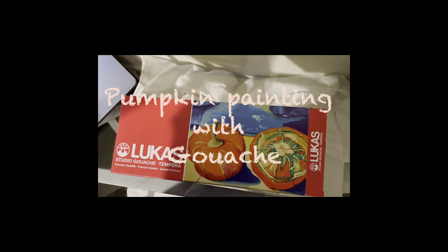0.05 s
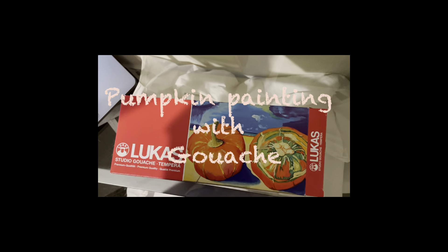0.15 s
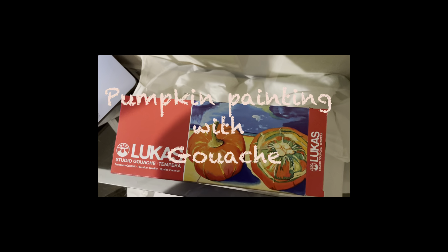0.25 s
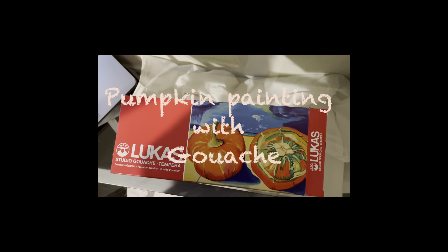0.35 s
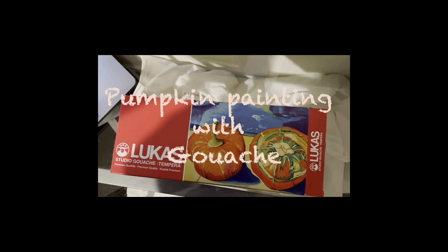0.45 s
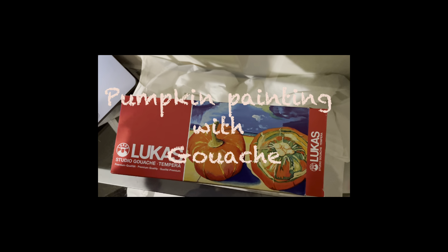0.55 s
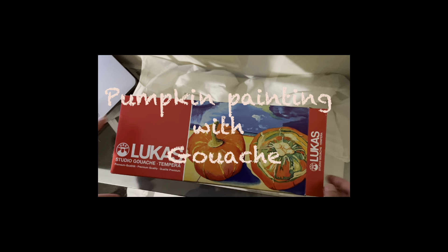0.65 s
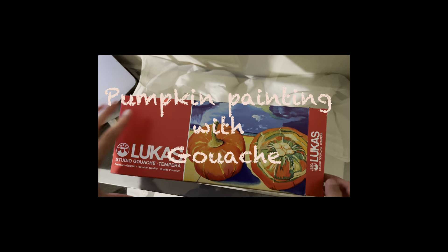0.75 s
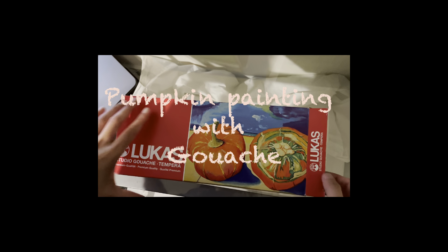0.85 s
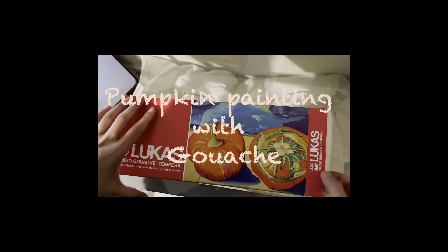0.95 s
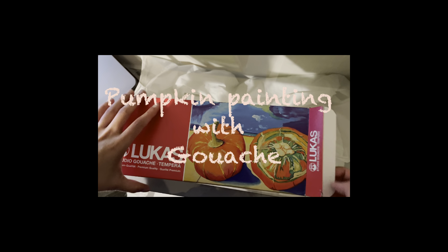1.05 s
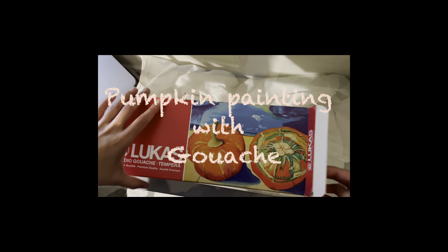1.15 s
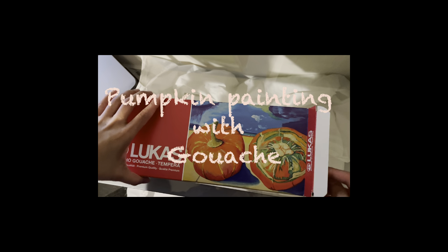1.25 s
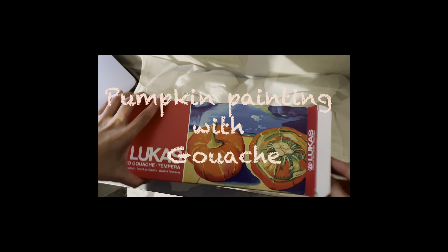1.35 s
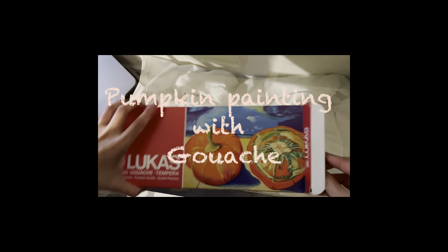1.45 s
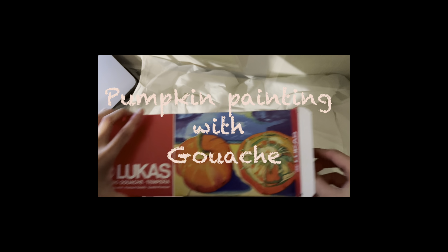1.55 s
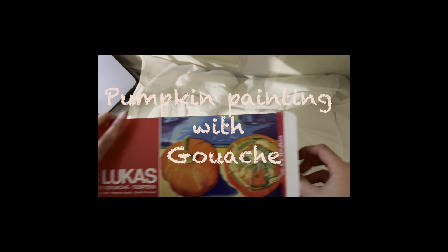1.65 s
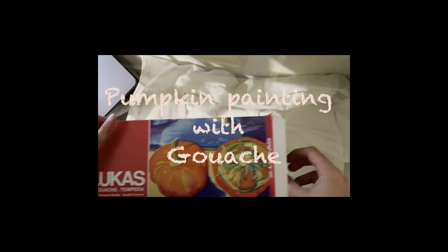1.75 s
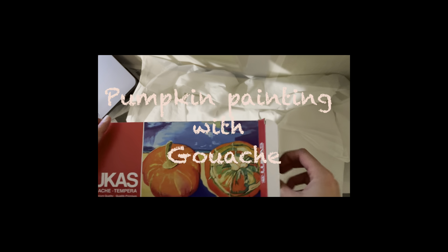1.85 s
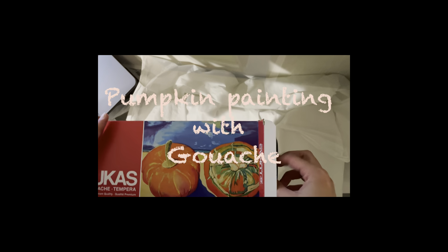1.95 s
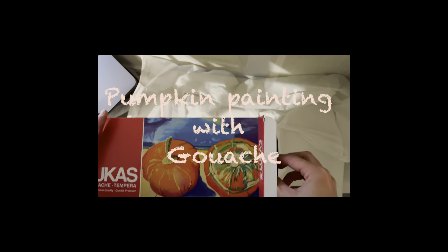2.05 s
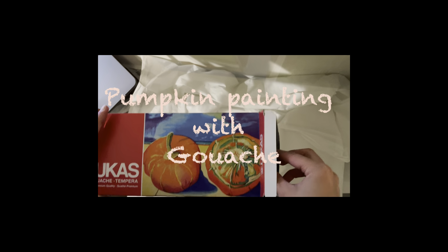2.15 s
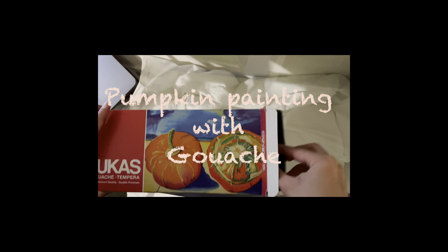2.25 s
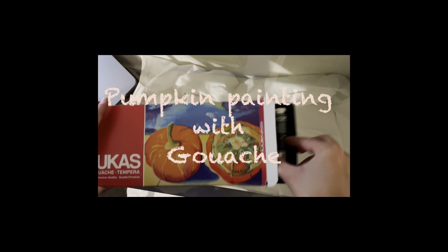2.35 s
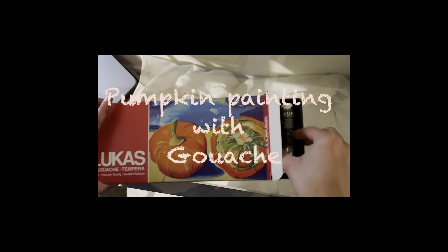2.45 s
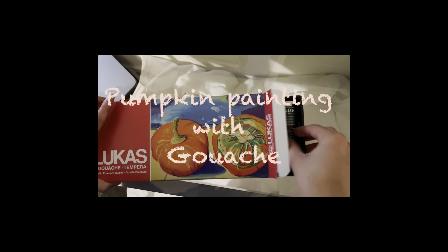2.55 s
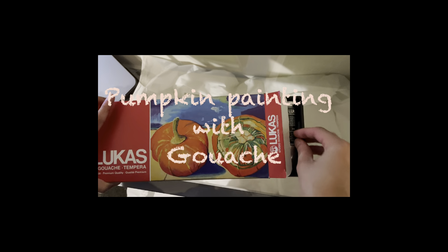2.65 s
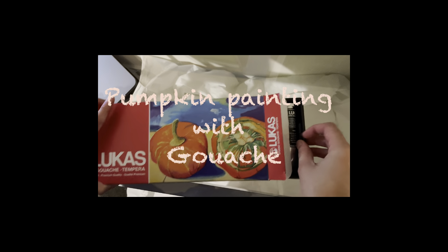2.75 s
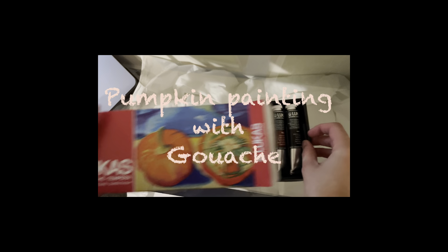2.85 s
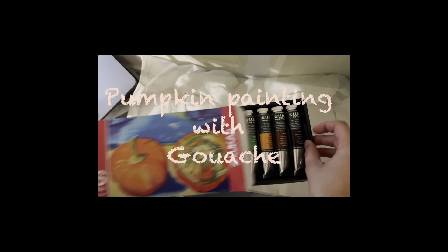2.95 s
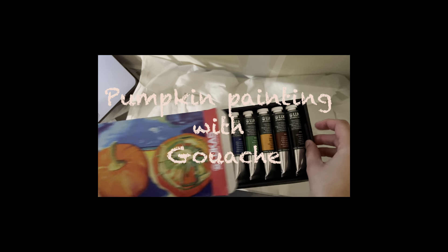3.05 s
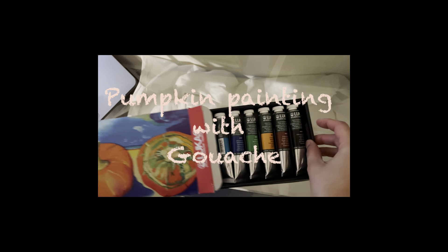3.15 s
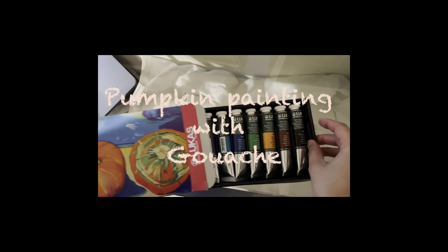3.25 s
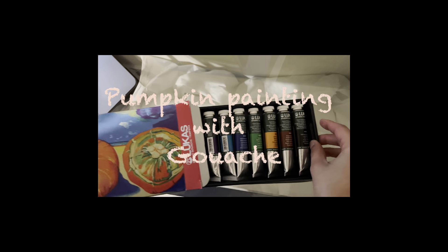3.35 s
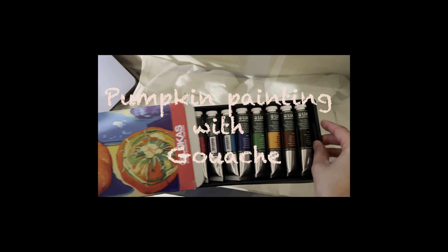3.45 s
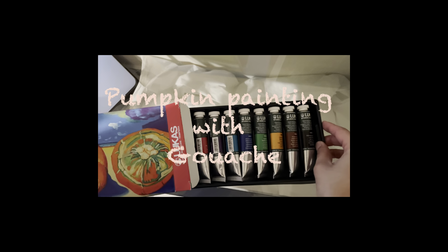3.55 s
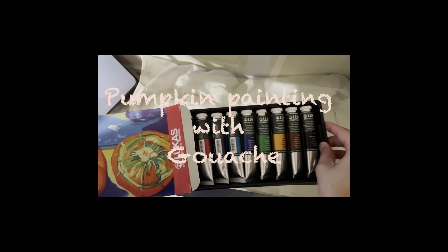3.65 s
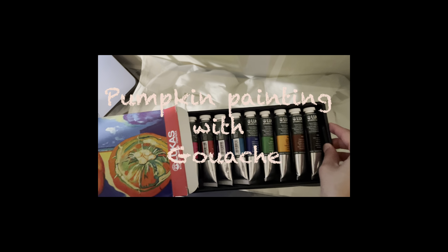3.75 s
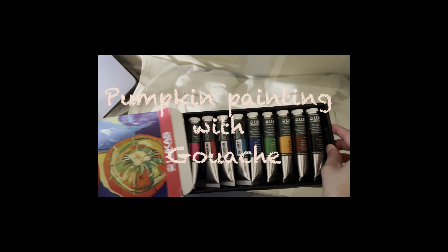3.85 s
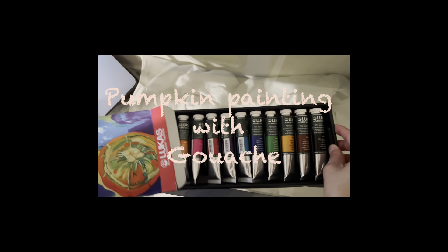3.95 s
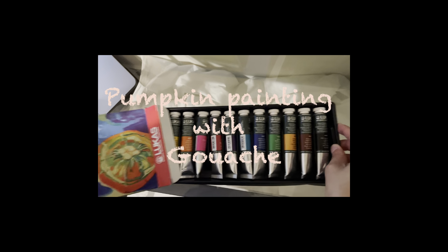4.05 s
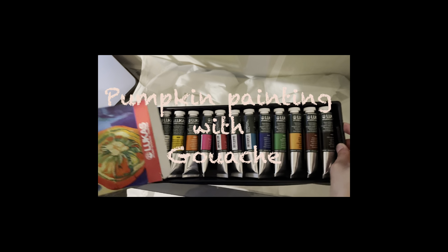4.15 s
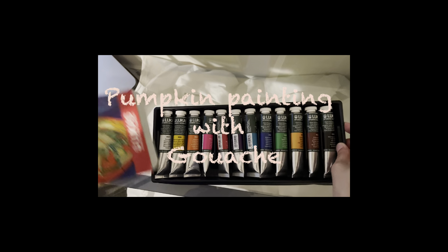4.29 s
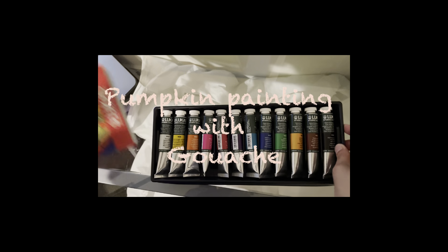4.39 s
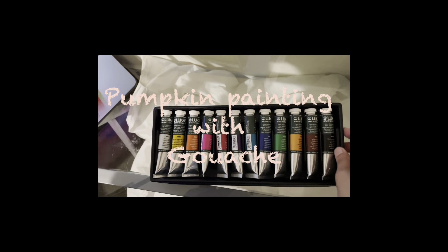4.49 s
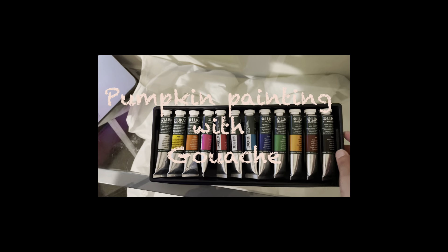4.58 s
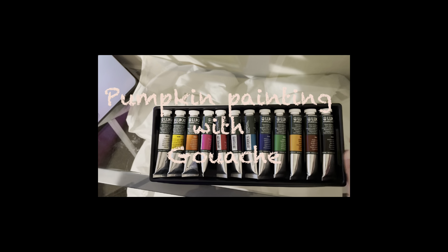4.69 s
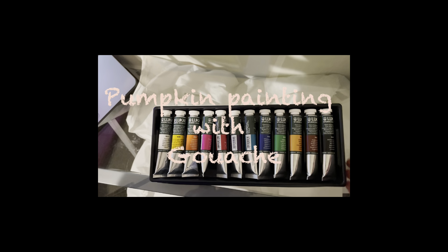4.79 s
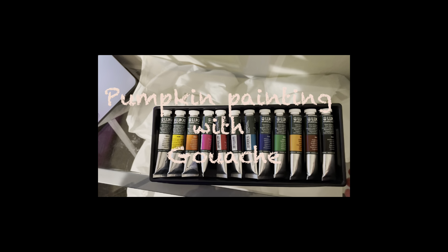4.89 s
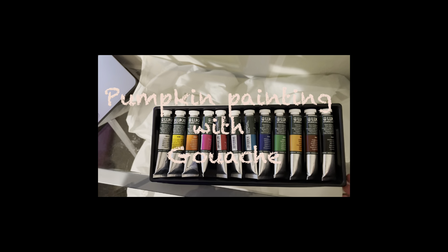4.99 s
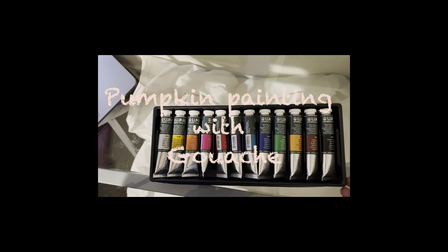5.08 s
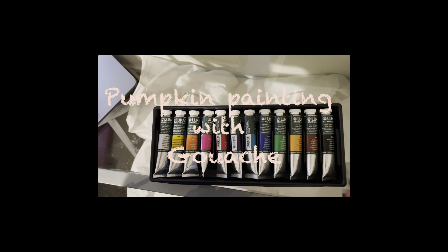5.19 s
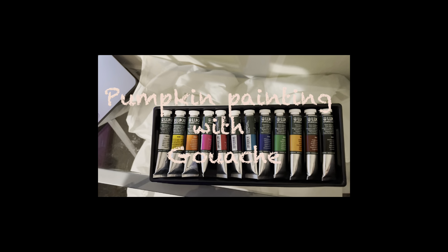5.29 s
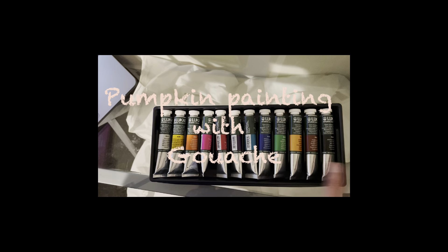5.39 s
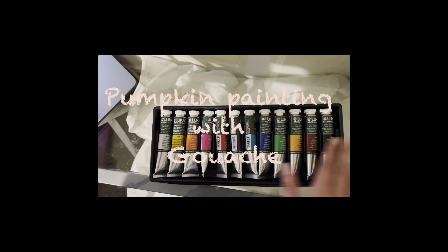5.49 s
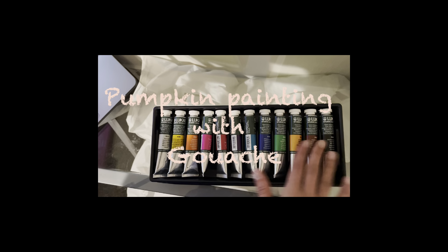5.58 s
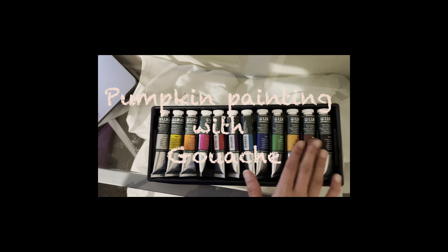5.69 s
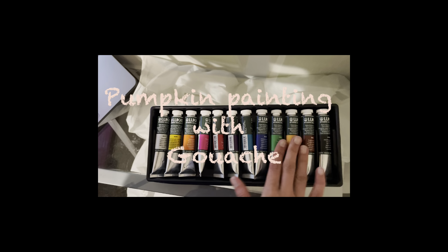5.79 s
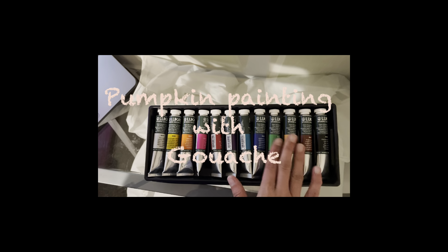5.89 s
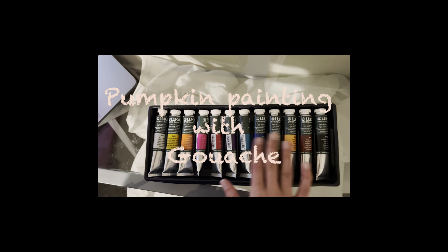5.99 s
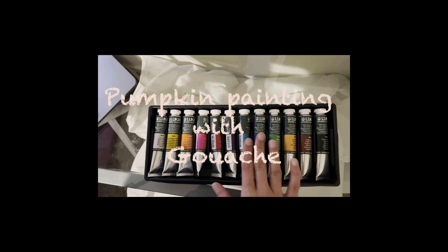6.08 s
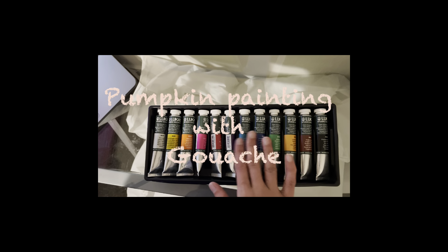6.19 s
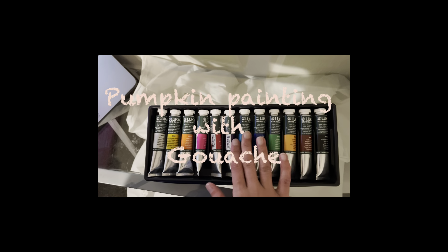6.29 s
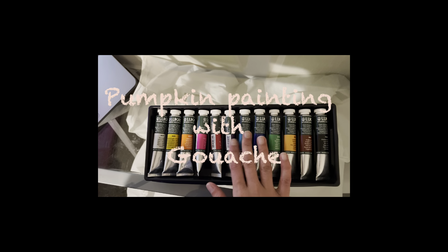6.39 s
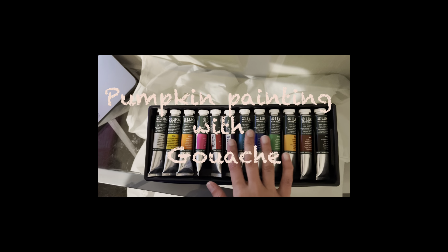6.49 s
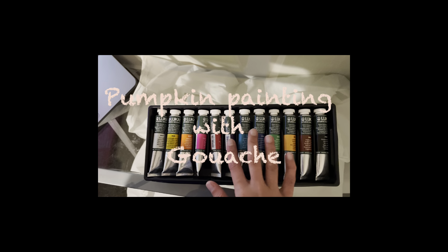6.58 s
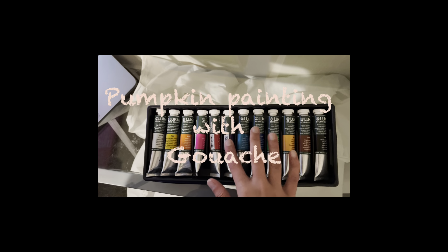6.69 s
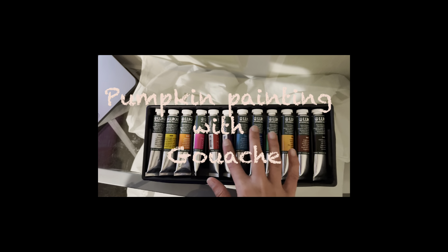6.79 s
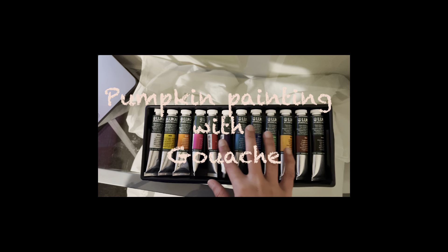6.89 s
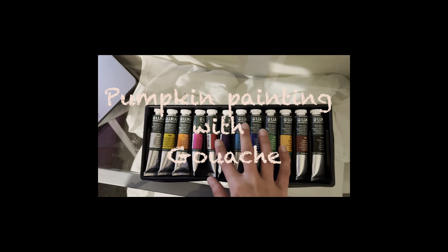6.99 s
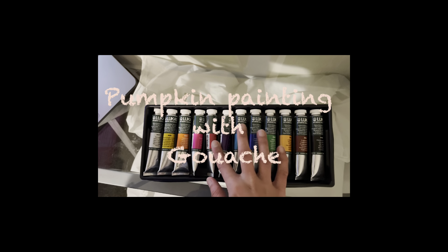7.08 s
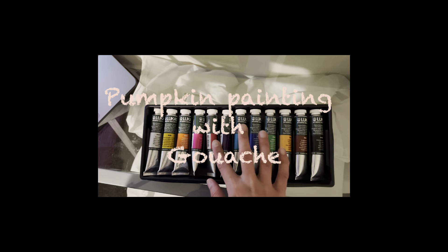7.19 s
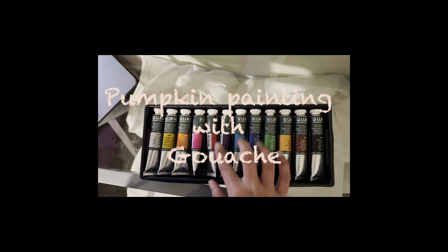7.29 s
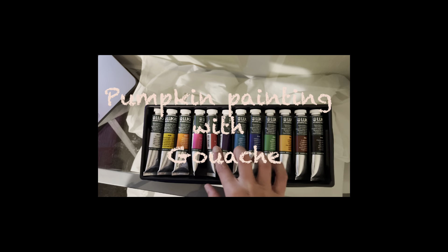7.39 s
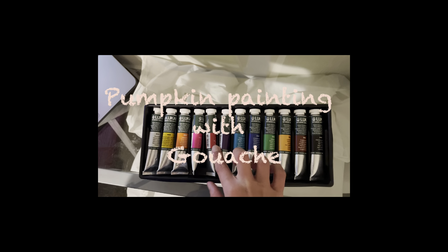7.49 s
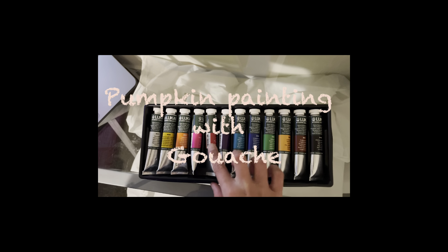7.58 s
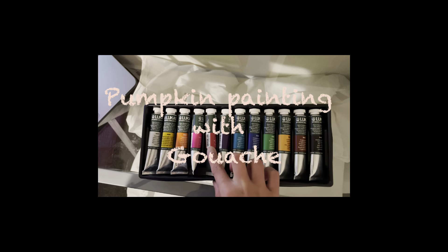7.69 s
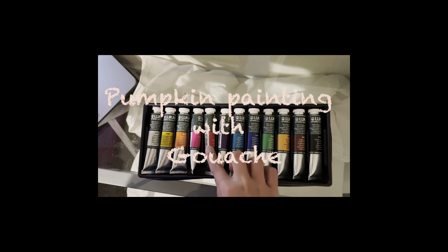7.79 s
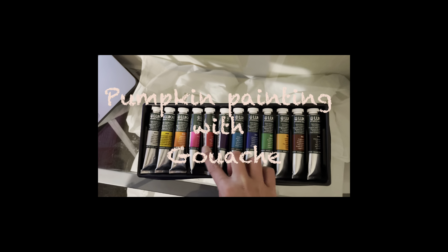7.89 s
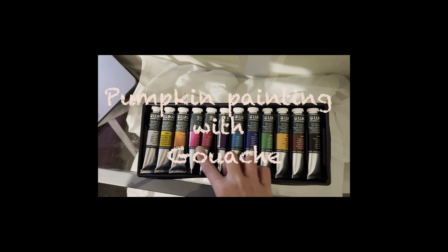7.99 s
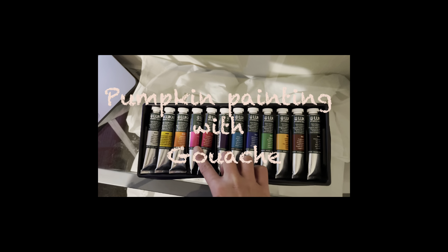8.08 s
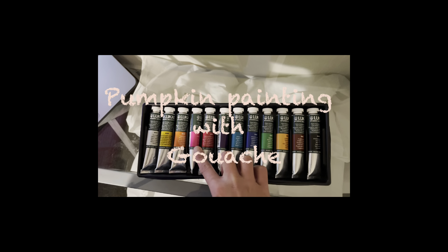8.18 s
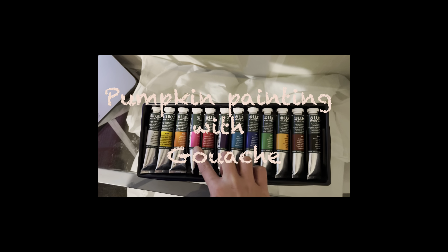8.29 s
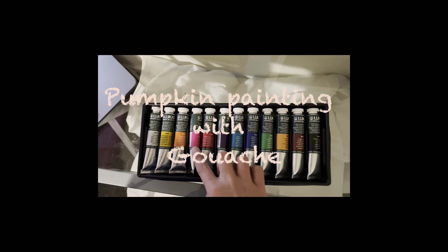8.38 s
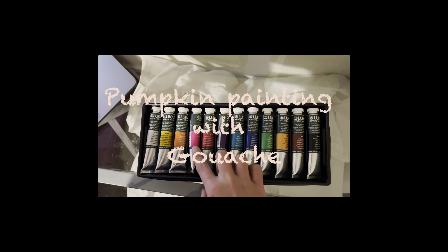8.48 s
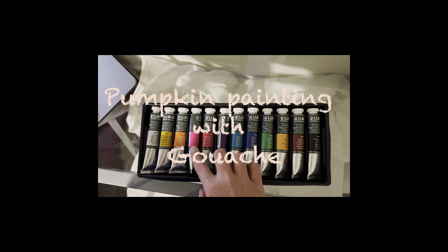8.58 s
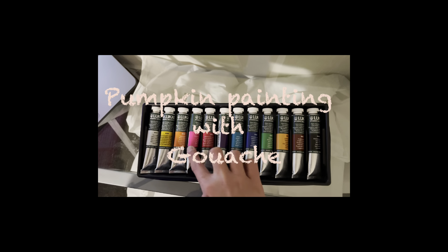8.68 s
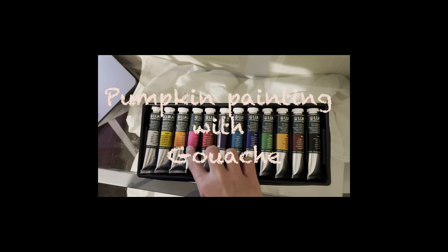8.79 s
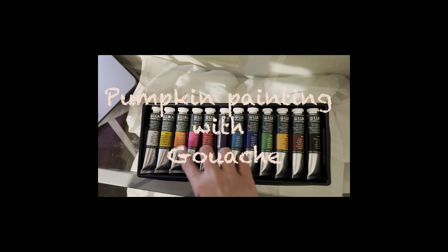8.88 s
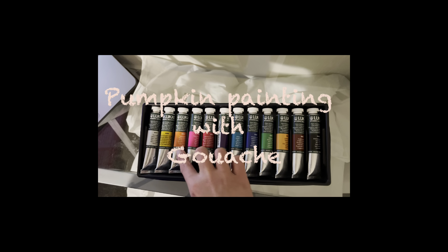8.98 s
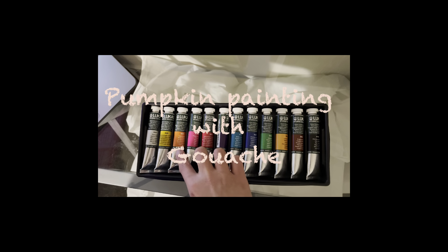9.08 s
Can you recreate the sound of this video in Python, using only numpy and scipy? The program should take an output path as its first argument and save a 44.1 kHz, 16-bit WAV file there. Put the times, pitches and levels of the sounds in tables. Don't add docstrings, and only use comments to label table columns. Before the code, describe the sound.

A close, dry perspective in a small furnished room, with soft air, a faint appliance hum and low traffic rumble throughout. From about 0.6 s fingers brush a cardboard box; small knocks near 1.0 lead to a sharp crack at 1.35, then papery rubs and a light squeak until 1.9. A short scraping tug at 2.1-2.4 ends in a clack, followed by a hard, hollow knock at 2.6. The longest, loudest gritty slide runs 2.75-3.55, swelling early, with knocks at 3.2 and 3.4. A third pull from 3.6 breaks into a strong clatter at 3.9-4.3 with table thumps. Quiet card rubbing fades by 5. Fingers then touch the tubes: a crisp knock at 5.7, soft rolling and thuds around 6.0-6.2, sparse faint ticks and rubs, another firm knock at 8.2 and small taps to 9. A distant engine drones faintly around 5.5-6.7 and briefly again between 7 and 8.

```python
import sys
import numpy as np
from scipy import signal
from scipy.fft import rfft, irfft, next_fast_len
from scipy.io import wavfile

SR = 44100
rng = np.random.default_rng(int(sys.argv[2]) if len(sys.argv) > 2 else 0)


def wrap_up_sound(samples):
    columns = np.atleast_2d(samples).T
    tamed = np.clip(columns, -1, 1)
    steps = np.round(tamed * 32767).astype(np.int16)
    wavfile.write(sys.argv[1], SR, steps)


def field_ratio(decibels):
    return 10 ** (np.asarray(decibels, dtype=float) / 20)


N = 403074

# [f/Hz, level/dB per Hz]
DUST = [(2940, -7.5), (5000, -4.5), (6020, -6.5), (12800, -15), (15100, -17), (16000, -13)]


def rms_one(x):
    return x / np.sqrt(np.mean(x ** 2) + 1e-20)


def in_time(tables, fade_s=0.0083):
    t, rows = np.arange(N) / SR, np.concatenate(tables)
    gate = sum(np.clip(np.minimum(t - r[0][0], r[-1][0] - t) / fade_s + 2, 0, 1) for r in tables)
    return [np.minimum(gate, 1)] + [np.interp(t, rows[:, 0], c) for c in rows[:, 1:].T]


def drift(rate):
    r = np.exp(-2 * np.pi * rate / SR)
    return rms_one(signal.lfilter([1], [1, -2 * r, r * r], rng.standard_normal(N + SR))[SR:])


def colour(x, spectrum):
    size = next_fast_len(N)
    hz, db = np.transpose(spectrum)
    f = np.maximum(np.fft.rfftfreq(size, 1 / SR), 1)
    gain = field_ratio(np.interp(np.log(f), np.log(hz), db))
    return rms_one(irfft(rfft(x, size) * gain, size)[:N])


def resonance(x, hz, width):
    r = np.exp(-np.pi * width / SR)
    poles = [1, -2 * r * np.cos(2 * np.pi * hz / SR), r * r]
    return signal.lfilter(np.array([1, 0, -1]) * (1 - r * r) / 2, poles, x)


def body(x, modes):
    parts = (field_ratio(db) * resonance(x, hz, w) / np.sqrt(w) for hz, w, db in modes)
    return rms_one(sum((-1) ** k * part for k, part in enumerate(parts)))


def slips(per_s, spread_db, clump_db):
    sizes = field_ratio(spread_db * np.minimum(rng.exponential(1, N), 5)) * rng.choice([-1, 1], N)
    born = rng.random(N) < per_s / SR
    return rms_one(sizes * born * field_ratio(clump_db * drift(60)) + 1e-18)


def patchy(x, depth_db, rate):
    edges = np.geomspace(500, 16500, 45)
    out = np.zeros(N)
    for k, pair in enumerate(zip(edges, edges[1:])):
        band = signal.sosfilt(signal.butter(2, pair, "band", fs=SR, output="sos"), x)
        out += (-1) ** k * band * field_ratio(depth_db * drift(rate))
    return rms_one(out)


def struck(events, over_db):
    size = 8000
    out, t = np.zeros(N + size), np.arange(size) / SR
    for (s, length, hz, db), n in zip(events, rng.standard_normal((len(events), size))):
        shove = n * np.exp(-t / (0.25 * length))
        tone = resonance(resonance(shove, hz, 4.4 / length), hz, 4.4 / length)
        out[round(s * SR):][:size] += field_ratio(db + over_db) * tone / np.abs(tone).max()
    return out[:N]


def background():
    # [f/Hz, level/dB per Hz]
    air_spectrum = [(25, -19.5), (127, -5.5), (520, -18), (1000, -12), (2220, -22), (3250, -36.5),
                    (12500, -71.5), (16000, -76.5)]
    # [f/Hz, width/Hz, level/dB]
    room_tones = [(124, 36, -72), (256, 9.5, -69), (970, 67, -81.5), (1450, 42, -68.5)]
    # [f/Hz, level/dB]
    mains = [(120, -78.5), (240, -63.5)]
    # [t/s, pitch/Hz, level/dB]
    drone = [
        [(5.45, 240.6, -85), (5.6, 255.3, -53), (5.75, 278.3, -55.5), (6.45, 282.8, -59), (6.7, 275.4, -95)],
        [(7.05, 226, -91), (7.1, 224.5, -44), (7.2, 217.5, -59), (7.25, 243, -76)],
        [(7.4, 268, -70), (7.85, 257, -54.5), (7.95, 256, -96)],
    ]
    # [t/s, rumble level/dB, relative room air level/dB]
    outside = [(0.0, -79, 2), (0.3, -61, 2.5), (3.51, -63, 1), (4.2, -70, 5), (4.38, -64.5, -1),
               (5.52, -63, -1.5), (5.9, -58.5, -0.5), (6.49, -64, 1), (6.82, -58.5, -0.5),
               (8.09, -61, -1.5), (8.38, -57.5, -0.5), (9.14, -60, -1)]
    t = np.arange(N) / SR
    _, rumble_db, air_db = in_time([outside])
    air = field_ratio(-57 + 0.8 * drift(3.5)) * colour(rng.standard_normal(N), air_spectrum)
    air += sum(field_ratio(db) * rms_one(resonance(rng.standard_normal(N), hz, w)) for hz, w, db in room_tones)
    hum = sum(field_ratio(db + 0.5 * drift(4.9)) * np.sqrt(2) * np.sin(2 * np.pi * hz * t) for hz, db in mains)
    low_band = signal.butter(2, [60, 170], "band", fs=SR, output="sos")
    low = signal.sosfilt(low_band, rng.standard_normal(N))
    traffic = field_ratio(rumble_db - 0.5 + 0.96 * drift(7.5)) * rms_one(low)
    gate, hz, db = in_time(drone)
    phase = 2 * np.pi * np.cumsum(hz + 5 * drift(10)) / SR
    engine = gate * field_ratio(db + 2.5 * drift(9)) * np.sin(phase)
    return field_ratio(air_db) * air + hum + traffic + engine


def reflections(x):
    size = next_fast_len(N + SR)
    f = np.fft.rfftfreq(size, 1 / SR)
    t60 = 0.21 / (1 + f / 5000)
    wet = 0
    for k, delay_s in enumerate(rng.uniform(.006, .025, 8)):
        loop = field_ratio(-60 * delay_s / t60) * np.exp(-2j * np.pi * f * delay_s)
        wet = wet + (-1) ** k * (1 / (1 - loop) - 1)
    return irfft(rfft(x, size) * wet, size)[:N]


def thumps():
    # [t/s, level/dB, f/Hz]
    table_thumps = [(1.06, -46, 129), (1.1, -42.5, 253), (4.287, -48, 312), (2.609, -50, 151),
                    (4.018, -39.5, 220), (4.051, -40.5, 300), (4.168, -45, 273), (5.69, -42, 251),
                    (5.759, -46.5, 99), (5.69, -48.5, 75), (5.52, -53, 120), (6.018, -44.5, 99),
                    (6.178, -41.5, 106), (6.191, -41, 254), (8.179, -40, 98.5), (8.18, -45.5, 292),
                    (4.02, -42, 125), (4.03, -48, 75), (4.035, -38.5, 240), (4.045, -42, 120),
                    (4.055, -48, 80), (4.125, -52.5, 70), (8.192, -46, 200), (6.03, -45.5, 280)]
    return struck([(s, .04, hz, db) for s, db, hz in table_thumps], over_db=4.5)


def hollows():
    # [t/s, length/s, f/Hz, level/dB]
    card_rings = [(1.078, 0.038, 696, -43), (2.592, 0.0081, 440, -34), (2.609, 0.019, 1200, -28),
                  (2.612, 0.025, 600, -37), (4.168, 0.049, 970, -39.5), (4.284, 0.03, 500, -40),
                  (2.616, 0.03, 410, -35), (5.684, 0.015, 480, -39), (3.879, 0.019, 670, -29),
                  (6.02, 0.04, 885, -52), (6.185, 0.031, 1130, -44), (8.18, 0.025, 1370, -38.5),
                  (8.177, 0.019, 700, -42), (8.188, 0.03, 1010, -43), (4.03, 0.018, 1700, -26.5),
                  (4.04, 0.07, 410, -39), (1.8, 0.024, 800, -44), (2.62, 0.026, 300, -42.5)]
    return struck(card_rings, over_db=6.5)


def squeaks():
    # [t/s, length/s, f/Hz, level/dB]
    pitched_rubs = [(1.5, 0.08, 9840, -63), (1.59, 0.12, 2800, -55), (1.855, 0.052, 2800, -50),
                    (1.855, 0.024, 7200, -56.5), (1.965, 0.041, 5540, -57), (2.665, 0.047, 4470, -53),
                    (4.525, 0.089, 2720, -54.5), (4.99, 0.14, 2890, -71), (6.05, 0.022, 3040, -58),
                    (7.28, 0.057, 3340, -65.5), (7.67, 0.08, 5440, -64), (1.545, 0.095, 1050, -51.5),
                    (2.47, 0.066, 4770, -57), (7.912, 0.047, 2180, -47.5), (8.1, 0.043, 4570, -64),
                    (8.59, 0.21, 6000, -73)]
    partials = [(1, 0), (1.5, -7), (2.02, -17), (2.9, -21)]   # (ratio, dB)
    size = 8000
    out, t = np.zeros(N + size), np.arange(size) / SR
    for (s, length, hz, db), n in zip(pitched_rubs, rng.standard_normal((len(pitched_rubs), size))):
        tone, width = 0, 0.22 * hz
        for ratio, partial_db in partials:
            if ratio == 1 or ratio * hz < SR / 3:
                held = resonance(resonance(n, ratio * hz, width), ratio * hz, width)
                tone = tone + field_ratio(partial_db) * rms_one(held)
        swell = np.sin(np.pi * np.clip(t / length, 0, 1) ** 0.44) ** 0.32
        out[round(s * SR):][:size] += field_ratio(db) * tone * swell
    return out[:N]


def rubs():
    # [peak t/s, rise/s, fall/s, rub level/dB,
    # relative dust level/dB]
    finger_rubs = [(.33, .2, 0.25, -74, -10), (.665, 0.015, 0.11, -67, -11), (.81, 0.09, 0.047, -63, -8),
                   (.91, 0.05, 0.15, -63.5, 7.5), (1.02, 0.021, 0.15, -64, 4.5),
                   (1.205, 0.044, 0.06, -61, 6.5), (1.29, 0.089, 0.097, -58, 5.5),
                   (1.42, 0.066, 0.1, -56.5, -2), (1.62, 0.11, 0.072, -49, -3), (1.86, 0.19, 0.14, -67, 6),
                   (2.08, 0.41, 0.059, -57, -17), (2.53, 0.15, 0.16, -57, 5), (2.67, 0.027, 0.054, -58, -1),
                   (4.2, 0.16, 0.043, -51, -5.5), (4.272, 0.049, 0.05, -63, 12),
                   (4.57, 0.33, 0.089, -62.5, -5), (4.7, 0.15, 0.037, -66.5, 5.5),
                   (4.955, 0.012, .03, -67, -3), (5.02, 0.044, 0.064, -64, -12),
                   (5.62, 0.059, 0.14, -65.5, -5), (5.74, 0.17, 0.19, -68, 2), (5.88, .05, 0.027, -65, -9),
                 (6.0, 0.02, .03, -67, -10), (6.055, 0.014, 0.035, -53.5, -14),
                 (6.122, 0.021, 0.086, -52.5, -1), (6.168, 0.042, 0.023, -42.5, -2.5),
                 (6.62, 0.039, 0.058, -68, -9), (6.886, 0.14, 0.11, -59.5, -4.5),
                 (7.04, .04, 0.062, -66.5, -13), (7.21, 0.035, 0.055, -62.5, -12),
                 (7.3, .03, 0.035, -64.5, -10), (7.4, .02, 0.036, -64, -12),
                 (7.52, 0.081, 0.055, -62.5, -2), (7.68, 0.079, 0.19, -63, -9),
                 (7.85, 0.22, 0.13, -59.5, -10), (7.92, 0.062, 0.21, -56, -7), (8.1, 0.066, .08, -69, -22),
                 (8.172, 0.01, 0.0093, -51.5, 13.5), (8.259, 0.089, 0.021, -57, -7),
                 (8.619, 0.037, 0.076, -61.5, 1.5), (8.819, 0.015, 0.029, -52.5, -2.5),
                 (8.99, 0.074, 0.11, -66.5, -17)]
    edge_db = [10.5, 15]
    t, power = np.arange(N) / SR, np.zeros((2, N))
    for s, rise, fall, db, dust_db in np.array(finger_rubs):
        near = slice(max(round((s - 3 * rise) * SR), 0), round((s + 3 * fall) * SR))
        away = np.abs((t[near] - s) / np.where(t[near] < s, rise, fall)) ** 1.46
        power[:, near] += field_ratio(np.array([[db], [db + dust_db]]) - np.outer(edge_db, away)) ** 2
    return np.sqrt(power)


def fingers():
    # [f/Hz, level/dB per Hz]
    skin = [(410, -3), (931, 0.5), (1550, 0.5), (2920, 2.5), (3300, -0.5), (8000, -24.5), (10400, -17.5),
            (17600, -120)]
    rub, dust = rubs()
    grit = patchy(slips(per_s=5000, spread_db=2.8, clump_db=1.3), depth_db=3.2, rate=11)
    return rub * colour(grit, skin) + dust * colour(grit, DUST)


def knocks():
    # [t/s, peak level/dB, ring f/Hz, relative crack level/dB, contact/s]
    sharp = [(0.655, -47, 3000, -7, 0.012), (1.017, -34, 1400, -19, 0.033), (1.028, -33, 1400, -20, 0.017),
             (1.042, -38, 1400, -20, 0.022), (1.3493, -15.5, 1600, -7, 0.011),
             (1.371, -32, 1500, -22, 0.016), (1.419, -43, 1500, -15, 0.011),
             (1.4273, -27.5, 2500, -15, 0.027), (1.448, -28, 2300, -11, 0.015),
             (1.545, -31, 1050, -10, 0.025), (2.355, -20.5, 1400, -3.5, 0.017),
             (2.397, -35, 1030, 8.5, 0.017), (2.558, -37, 993, -12, 0.0068), (2.577, -41, 3000, 0, 0.01),
             (2.589, -24.5, 900, -5, 0.02), (2.6071, -10, 1250, -22, 0.015),
             (3.223, -23.5, 750, -20, 0.018), (3.417, -24, 1030, -18, 0.013), (3.866, -23, 2000, -6, 0.011),
             (3.999, -22.5, 2500, -8.5, 0.013), (4.006, -23.5, 3500, -6.5, 0.012),
             (4.015, -17.5, 2450, -11, 0.013), (4.058, -23, 2000, -9.5, 0.012),
             (4.071, -22, 900, -5, 0.016), (4.163, -17, 850, -33, 0.025), (4.2795, -17.5, 1850, -15, 0.02),
             (4.392, -45.5, 3300, -21, 0.012), (4.471, -38.5, 1955, -21, 0.022),
             (5.6805, -17, 2020, -9, 0.01), (6.0135, -35.5, 3000, -14, 0.015),
             (6.022, -35, 900, -25, 0.025), (6.032, -38, 1200, -23, 0.02), (6.174, -28, 900, -7, 0.02),
             (6.195, -35, 1300, -22, 0.022), (8.1749, -19, 1800, -6, 0.011), (6.203, -35, 1300, -22, 0.02),
             (8.82, -39.5, 2500, -6, 0.02)]
    # [t/s, peak level/dB, ring f/Hz, relative crack
    # level/dB, contact/s]
    ticks = [(1.0745, -20, 1600, -2, 0.028), (3.8805, -9.5, 1740, -16, 0.026),
             (4.031, -12, 1500, -20.5, 0.029), (4.1235, -14, 3600, -10, 0.028),
             (5.437, -56, 1450, -27.5, 0.031), (5.678, -17, 2300, -10, 0.024),
             (5.851, -41.5, 2010, -19, 0.025), (5.871, -46, 1010, -12, 0.023),
             (6.01, -36.5, 2000, -13, 0.03), (6.111, -38, 2500, -11, 0.028),
             (6.353, -43.5, 1220, -27, 0.0138), (6.949, -54, 1170, -12, 0.019),
             (7.19, -31, 2020, -15, 0.035), (7.387, -49, 990, -16, 0.029), (7.564, -37.5, 1880, -36, 0.018),
             (7.666, -55, 840, 2, 0.036), (8.273, -37.5, 2250, -12, 0.022), (7.54, -49, 2500, 0, 0.015),
             (8.722, -46.5, 1450, 8, 0.018), (8.962, -37.5, 1170, -23, 0.019)]
    # [t/s, peak level/dB, ring f/Hz, relative crack level/dB, contact/s]
    scuffs = [
        (0.666, -37.5, 624, -19, 0.034),
        (0.907, -37, 600, -15, 0.044),
        (1.787, -33.5, 1160, -17, 0.059),
        (4.064, -23.5, 867, -12, 0.046),
        (5.584, -33.5, 1950, -9, 0.034),
        (5.75, -33.5, 1920, -12, 0.039),
        (6.157, -38, 2200, -6, 0.035),
        (7.917, -40, 2310, -1.5, 0.045),
        (8.16, -30.5, 3200, -12, 0.055),
    ]
    # [f/Hz, level/dB, t60/s]
    tray_modes = [(420, 3.5, 0.069), (510, 2.5, 0.024), (653, 0, 0.016), (844, -1, 0.049),
                  (1244, -0.5, 0.04), (1510, -2.5, 0.021)]
    events = sorted([(*row, .03) for row in sharp] + [(*row, .07) for row in ticks])
    events += [(*row, .2) for row in scuffs]
    size = 6000
    out, t = np.zeros(N + size), np.arange(size) / SR
    noise = rng.standard_normal((len(events), 2, size))
    uneven = rng.normal(0, 1, (len(events), 10))
    bright = signal.butter(2, [2600, 10500], "band", fs=SR, output="sos")
    for (s, db, hz, crack_db, contact_s, rise), (n, m), u in zip(events, noise, uneven):
        contact_s = max(contact_s, .002)
        thud_db = -18 - 0.1763 * (db + 28) - 6 * np.log2(hz / 1300)
        rattle = n * field_ratio(-60 * t / contact_s) * (1 - np.exp(-t / (rise * contact_s))) ** 2
        if rise < .1:
            touch = np.exp(-((t - 1.403 * rise * contact_s) / 0.00016) ** 2)
            rattle += 0.54 * np.gradient(touch) * 0.000073 * SR
        ring = 0
        for k, ratio in enumerate((.72, 1, 1.4, 2.05)):
            mode = resonance(rattle, hz * ratio, 250 + 0.15 * hz * ratio)
            ring = ring + field_ratio(1.8 * u[k] - 7.2 * abs(k - 1)) * mode
        plastic = signal.butter(2, min(4.36 * hz, .4 * SR), fs=SR, output="sos")
        ring = signal.sosfilt(plastic, ring)
        crack = signal.sosfilt(bright, rattle * field_ratio(-25 * t / contact_s))
        shove = m * (t / .006) ** 2 * np.exp(-t / (0.003 + 0.075 * contact_s))
        thud = sum(field_ratio(d + 2.5 * u[4 + k]) * resonance(shove, f, 2.2 / t60)
                   for k, (f, d, t60) in enumerate(tray_modes))
        parts = (-1.5, ring), (crack_db, crack), (thud_db, thud)
        hit = sum(field_ratio(g) * p / np.abs(p).max() for g, p in parts)
        out[round((s - min(rise, .08) * contact_s) * SR):][:size] += field_ratio(db) * hit
    return out[:N]


def slide():
    # [t/s, level/dB]
    tugs = [
        [(2.1, -62), (2.136, -51), (2.18, -53), (2.288, -39), (2.335, -36), (2.368, -37), (2.385, -50.5),
         (2.44, -69)],
        [(2.712, -71), (2.746, -42), (2.836, -28), (3.188, -42), (3.278, -42), (3.344, -46.5), (3.476, -38),
         (3.506, -42), (3.554, -65)],
        [(3.57, -61), (3.646, -44), (3.798, -43), (3.868, -36.5), (3.976, -38), (4.008, -34.5), (4.045, -35),
         (4.067, -32.5), (4.118, -43.5)],
    ]
    # [t/s, share/0-1]
    covered = [
        (2.2, 0.65),
        (2.34, 0.73),
        (2.78, 0.94),
        (2.9, 0.88),
        (3.0, 0.74),
        (3.19, 0.58),
        (3.87, 0.51),
        (4.0, 0),
    ]
    # [f/Hz, width/Hz, level/dB]
    sleeve_air = [(1026, 30, -2.5), (1223, 74, 4), (1312, 90, 4.5), (1400, 36, 0), (1537, 63, -4),
                  (1670, 44, -10), (1870, 80, -5.5), (2330, 60, -1), (2470, 90, -1)]
    # [f/Hz, width/Hz, level/dB]
    card_walls = [(530, 110, 1), (590, 63, 1.5), (688, 67, -1), (940, 60, -2.5)]
    # [f/Hz, width/Hz, level/dB]
    ribs = [(1950, 96, 14.5), (2610, 120, 14.5), (3060, 160, 13.5), (4690, 120, 25)]
    # [f/Hz, level/dB per Hz]
    friction = [(900, -27), (1500, -8), (1900, -3), (2650, -6.5), (5000, -16), (8000, -25.5),
                (11000, -38.5)]
    gate, hiss_db = in_time(tugs)
    _, inside = in_time([covered])

    def coupled_db(tray_out, tray_inside):
        return hiss_db + tray_out + (tray_inside - tray_out) * inside

    grit = slips(per_s=9000, spread_db=1.5, clump_db=1.5)
    wall_grit = np.roll(grit, SR // 10)
    fibres = patchy(grit, depth_db=1.6, rate=14)
    hiss = rms_one(colour(fibres, friction) + 0.3 * body(fibres, ribs))
    sleeve = rms_one(resonance(body(wall_grit, sleeve_air), 1410, 900))
    panel = rms_one(resonance(body(wall_grit[::-1], card_walls), 650, 700))
    floor_hz, free_db = 406.4, np.interp(np.arange(N) / SR, (3, 3.86), [-13, -2])
    panel += field_ratio(free_db) * body(grit, [(floor_hz, 24, 0), (.76 * floor_hz, 60, -22)])
    return gate * (field_ratio(hiss_db) * hiss + field_ratio(coupled_db(-5, -7.5)) * colour(fibres, DUST)
                   + field_ratio(coupled_db(-22, 9.5)) * sleeve + field_ratio(coupled_db(-12.5, 0.5)) * panel)


def scene():
    near = slide() + fingers() + squeaks() + knocks() + hollows() + thumps()
    return (near + field_ratio(-19) * reflections(near) + background())[None]


def roll_off(x):
    return signal.sosfilt(signal.butter(12, 16510, fs=SR, output="sos"), x)


def record(dry):
    limit, start_s = 0.38, .0215
    x = signal.sosfilt(signal.butter(3, 55, "high", fs=SR, output="sos"), dry)
    x = limit * np.tanh(x / limit)
    x = signal.sosfilt(signal.cheby2(12, 50, 16300, fs=SR, output="sos"), x)
    return roll_off(x * (np.arange(N) >= start_s * SR))


dry = scene()
out = record(dry)
wrap_up_sound(out)
```